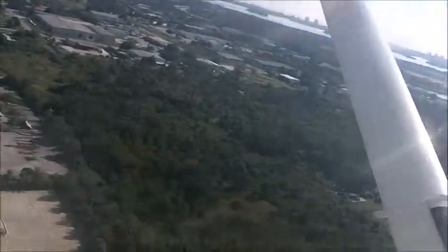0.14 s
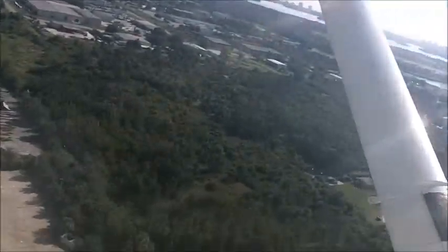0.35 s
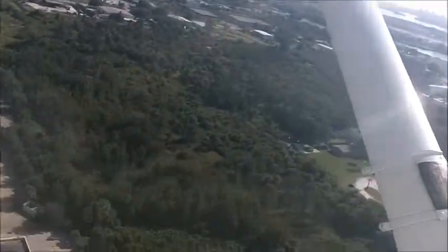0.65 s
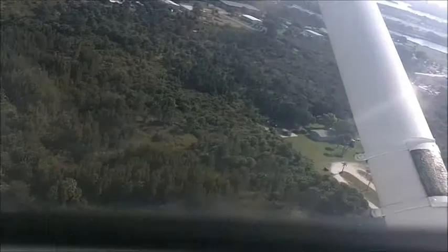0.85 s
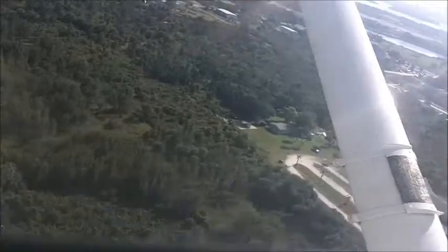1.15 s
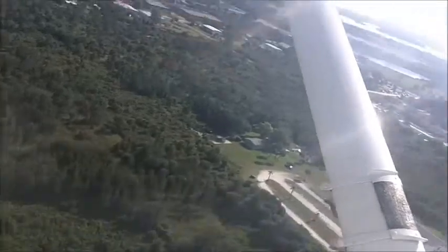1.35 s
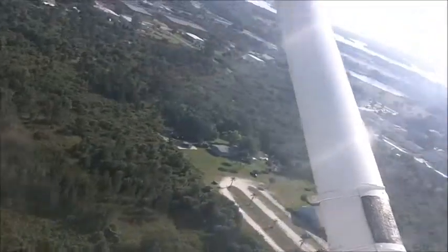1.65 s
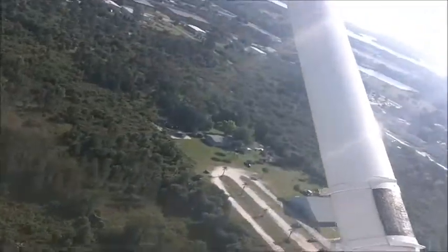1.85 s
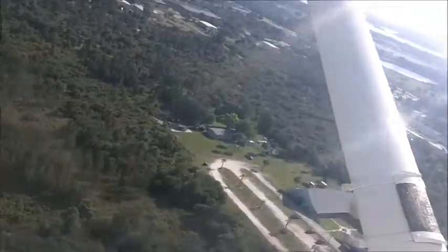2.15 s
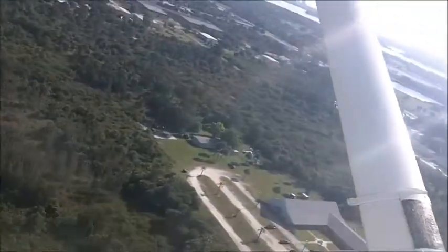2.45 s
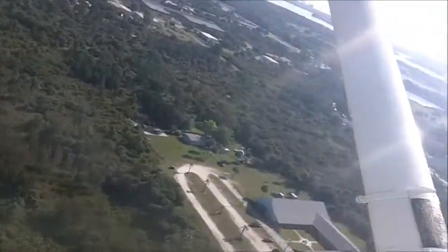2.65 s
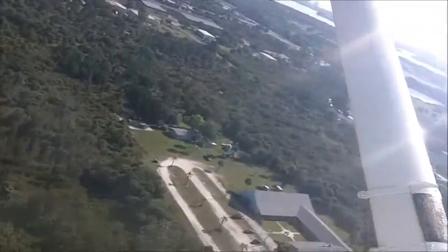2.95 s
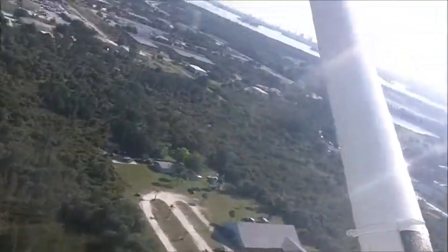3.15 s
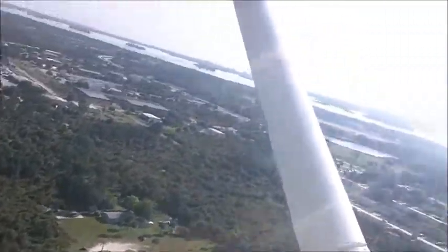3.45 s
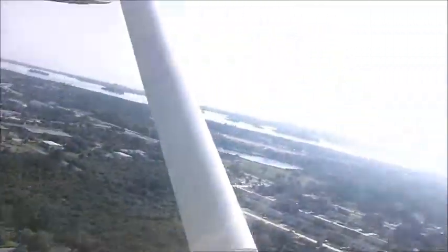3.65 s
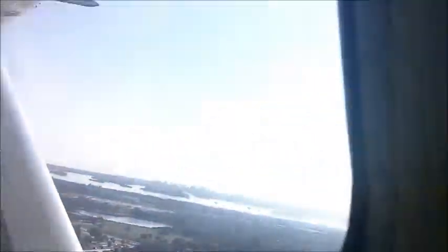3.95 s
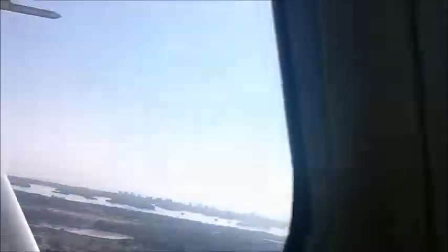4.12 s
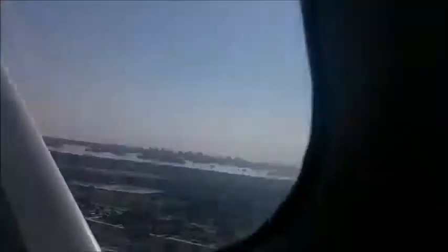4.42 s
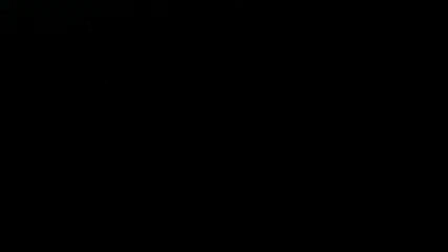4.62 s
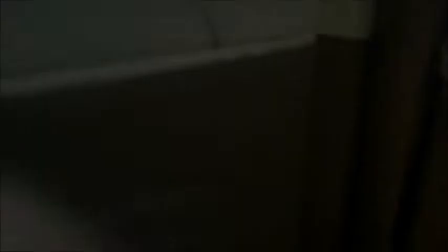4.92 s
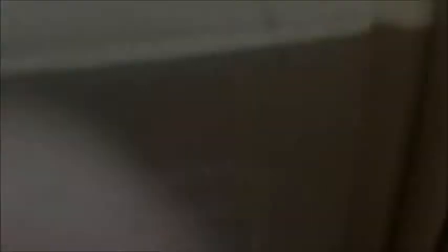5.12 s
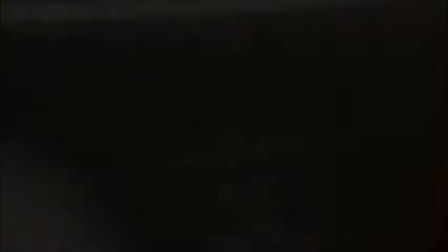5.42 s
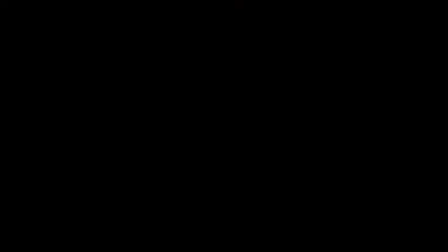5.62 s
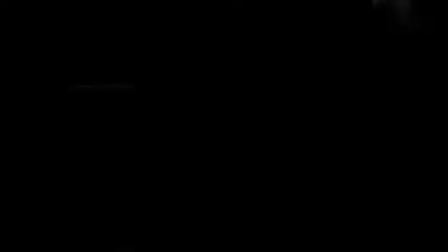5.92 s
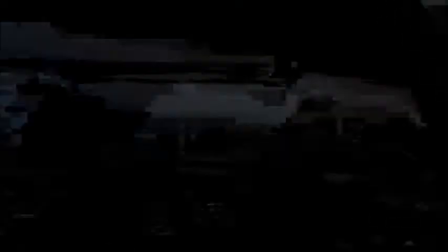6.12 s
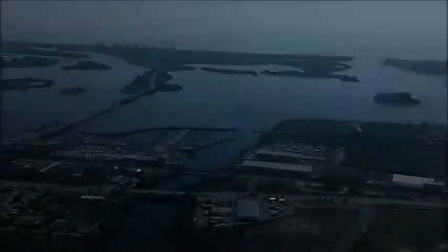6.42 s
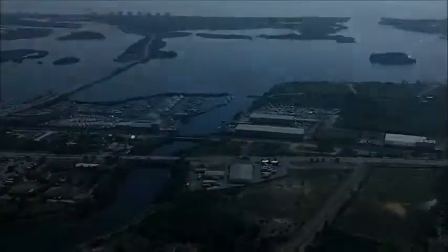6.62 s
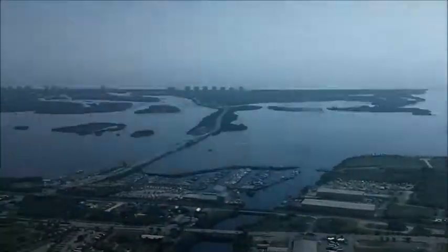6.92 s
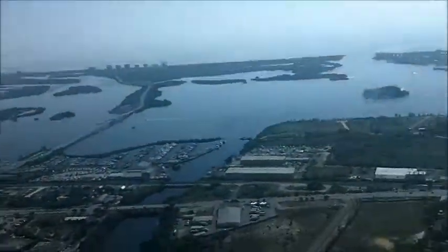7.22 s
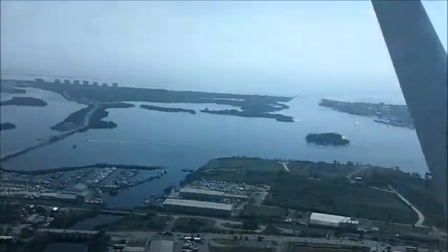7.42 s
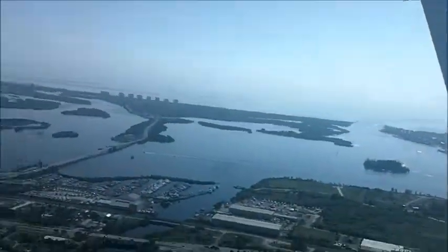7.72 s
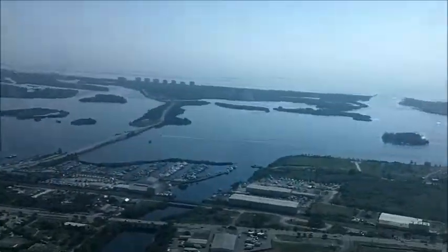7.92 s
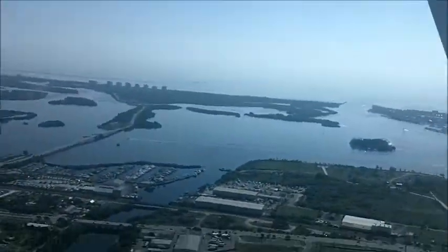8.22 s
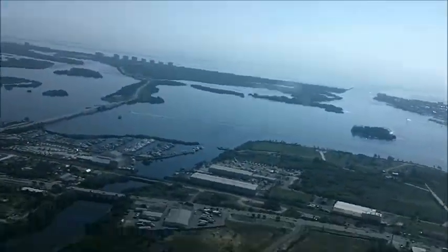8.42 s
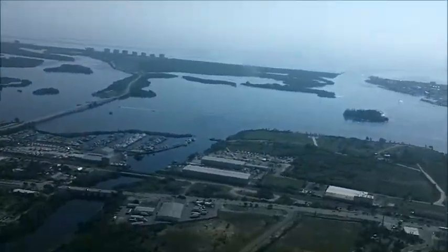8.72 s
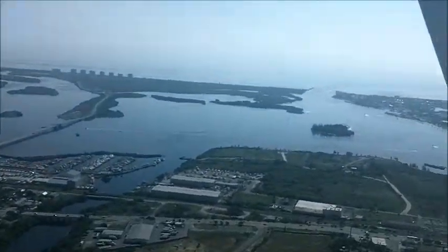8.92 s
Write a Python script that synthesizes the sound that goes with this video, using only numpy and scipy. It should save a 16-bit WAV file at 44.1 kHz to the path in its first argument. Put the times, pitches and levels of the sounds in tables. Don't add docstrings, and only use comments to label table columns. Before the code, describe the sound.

Inside a light aircraft cabin, a steady low engine and propeller drone fades with handling bumps, cuts out, then fades back in slightly higher.

```python
import sys
import numpy as np
from scipy import signal
from scipy.fft import rfft, irfft, next_fast_len
from scipy.io import wavfile

SR = 44100
rng = np.random.default_rng(int(sys.argv[2]) if len(sys.argv) > 2 else 0)


def transcribe(signal):
    frames = np.atleast_2d(signal).T
    limited = np.clip(frames, -1, 1)
    pcm = np.round(limited * 32767).astype(np.int16)
    wavfile.write(sys.argv[1], SR, pcm)


def attenuation_scalar(level_db):
    decades = np.asarray(level_db, float) / 20
    return 10 ** decades


N = 399546

# start [t/s], end [t/s]
TAKES = [
    (0, 5.56093),
    (5.894, 9.06),
]
# centre [t/s], change [level/dB], bell width [t/s]
PALM = [
    (4.8, -7, 0.017),
    (5.02, -3.5, .04),
    (5.2, -3, .02),
    (5.27, -3, 0.01),
    (5.3, -1.5, 0.17),
    (5.4, 0, .02),
    (7.52, -0.5, 0.086),
]
TURN_S = (3.79, 3.95)


def rms_one(x):
    return x / np.sqrt(np.mean(x ** 2) + 1e-20)


def in_time(rows):
    s, *columns = np.transpose(rows)
    return [np.interp(np.arange(N) / SR, s, c) for c in columns]


def at_hz(points, hz):
    points = np.array(points)
    return np.interp(np.log(hz), np.log(points[:, 0]), points[:, 1])


def drift(rate_hz, count=1):
    r = np.exp(-128 * np.pi * rate_hz / SR)
    draws = rng.standard_normal((count, N // 64 + 1002))
    slow = signal.lfilter([1], [1, -2 * r, r * r], draws)[:, 1000:]
    return np.array([np.interp(np.arange(N) / 64, np.arange(len(v)), rms_one(v)) for v in slow])


def span(take):
    return slice(round(take[0] * SR), min(N, round(take[1] * SR)))


def ramp(start_s, end_s):
    return np.clip((np.arange(N) / SR - start_s) / (end_s - start_s), 0, 1)


def swells(rows):
    t = np.arange(N) / SR
    return sum(db * np.exp(-.5 * ((t - s) / width_s) ** 2) for s, db, width_s in rows)


def engine(which, part):
    # [t/s], [f/Hz]
    revs_a = [(0.35, 79.16), (0.95, 79.05), (1.55, 78.99), (2.15, 79.03), (2.75, 79.05), (3.35, 79.03),
              (3.95, 79.02), (4.55, 78.87), (5.15, 78.94)]
    revs_b = [(6.25, 79.64), (6.85, 79.9), (7.45, 80.06), (8.05, 80.17), (8.65, 80.15)]
    # cycle order, re firing tone [level/dB]
    firing_a = [(4, -0.5), (8, -17), (12, -22), (16, -21), (20, -20), (24, -30.5), (28, -29.5), (32, -34),
                (36, -35), (40, -35), (44, -40)]
    firing_b = [(4, 0), (8, -11.5), (12, -23.5), (16, -30.5), (20, -28.5), (24, -29.5), (28, -31),
                (32, -40.5)]
    # cycle order, re firing tone [level/dB]
    uneven_a = [(1, -26.5), (2, -33.5), (3, -23.5), (5, -21.5), (6, -32.5), (7, -38.5), (9, -34),
                (10, -27.5), (11, -29.5), (21, -31.5), (22, -29), (26, -32), (27, -33), (42, -34.5)]
    uneven_b = [(1, -19), (2, -28), (3, -29.5), (5, -20.5), (6, -36.5), (7, -32), (9, -35), (10, -26.5),
                (11, -38)]
    # [t/s], lean [-1..1]
    lean_a = [(0.1, 0.11), (.45, 0.77), (1.15, -1.04), (1.75, 0.64), (2.5, -0.38), (3.3, -0.14),
              (3.8, 0.57), (4.6, 0.29), (5.3, -0.97)]
    lean_b = [(6.1, .3), (6.6, 0.12), (7.4, -0.47), (7.7, -0.39), (8.0, 1), (8.35, 0.68), (8.65, -.3),
              (9.0, -0.44)]
    tones_follow = [
        (1.8, .2, -3),
        (-3, 3.9, 2.5),
        (3.5, 2.5, 0.3),
        (1.5, 1.5, -1.5),
    ]
    tone_db = (-15.5, -16)[which]
    rest_db, rest_slope_db_per_order, crank_bonus_db = -31.5, -0.3747, 2
    flutter_db, jitter_rad = 1.0, .025

    revs, firing, uneven, lean_rows = ((revs_a, firing_a, uneven_a, lean_a),
                                       (revs_b, firing_b, uneven_b, lean_b))[which]
    cycle = np.cumsum(in_time(revs)[0][part]) * (np.pi / 2 / SR)
    cycle = cycle - cycle[-1]
    lean = in_time(lean_rows)[0][part]
    turned = ramp(*TURN_S)[part] * (which == 0)
    second, third, fifth, higher = [row[which] * lean + row[2] * turned for row in tones_follow]
    palm = 0.3 * swells(PALM)[part]
    place_db = {4: palm, 8: second, 12: third, 16: second, 20: fifth}
    order_db = {round(k): db for k, db in [*firing, *uneven]}
    wobble = drift(3.3, count=8)[:, part]
    out = 0
    for k in range(1, round(firing[-1][0]) + 1):
        chance = wobble[k % 7]
        unlisted_db = rest_db + rest_slope_db_per_order * k + crank_bonus_db * (k % 2 == 0)
        db = tone_db + order_db.get(k, unlisted_db)
        if k % 4 == 0:
            db = db + place_db.get(k, higher) + flutter_db * min(k / 16, 1) * chance
        else:
            db = db + (k > 20) * higher + 2.2 * flutter_db * chance
        shake = jitter_rad * np.sqrt(k) * wobble[(k * 3 + 1) % 8]
        phase = (k != 4) * rng.uniform(0, 2 * np.pi)
        out = out + np.sqrt(2) * attenuation_scalar(db) * np.cos(k * cycle + shake + phase)
    return out, cycle


def airflow(which, part, cycle):
    # [f/Hz], density [level/dB]
    roar_a = [(15, -5), (35, 1.5), (55, -3.5), (110, -3.5), (200, -3.5), (300, -10.5), (420, -9),
              (600, -18.5), (950, -21), (1500, -16), (2300, -23.5)]
    roar_b = [(15, -1), (35, -4), (55, -4.5), (110, -6.5), (200, -8.5), (300, -12.5), (420, -15),
              (600, -17), (950, -14.5), (1400, -23.5), (2300, -32.5)]
    # [f/Hz], density [level/dB]
    hiss = [(2350, 0), (2900, -2), (3400, .5), (4350, 2), (4940, 0), (5030, -6), (5350, -10), (6450, -8.5),
            (7300, -16), (8400, -18.5), (9550, -17), (10600, -20), (13200, -27), (15200, -28)]
    # [f/Hz], width [f/Hz], lift [level/dB]
    panels_a = [(393, 130, 3), (803, 140, 6.5), (1019, 60, 5), (1240, 26, 4)]
    panels_b = [(440, 110, 1.7), (787, 110, 5.2), (1060, 76, 1.8), (1224, 80, 8.6)]
    splits_hz = [60, 620, 1350, 2350]
    # first stretch, second stretch, turn [level/dB each], gust share, palm share
    air = [
        (-33.5, -34.5, 3, .3, .4),
        (-29.5, -32, -.7, 0.77, .4),
        (-36, -37, -4.5, 0.66, .6),
        (-42.5, -45.5, 0, .6, 0.82),
        (-45, -45, 1.55, .15, .8),
    ]
    # centre [t/s], change [level/dB], bell width [t/s]
    gusts = [
        (1.96, 0.5, .12),
        (2.31, -1.5, 0.13),
        (3.3, 0.5, .1),
        (7.21, 2.5, 0.034),
        (7.41, 2.5, 0.058),
        (7.68, 2, 0.065),
        (8.36, -0.5, 0.16),
        (8.85, 2, .06),
    ]
    pillar_s, pillar_width_s = 3.64, .13
    pillar_db = [0.1, 0, -1.5, -4, .5]
    patchy_db = [1.2, 0.9, 0.36, 0.74, .6]
    throb = 0.091

    roar, panels, tilt_db_per_oct = ((roar_a, panels_a, -.2), (roar_b, panels_b, 1.6))[which]
    size = next_fast_len(N)
    hz = np.maximum(np.arange(size // 2 + 1) * SR / size, 1)
    hiss_db = at_hz(hiss, hz) - tilt_db_per_oct * np.log2(hz / 4000)
    colour_db = np.where(hz < splits_hz[3], at_hz(roar, hz), hiss_db)
    colour_db = colour_db + sum(db / (1 + (2 * (hz - f) / w) ** 2) for f, w, db in panels)
    shaped = rfft(rng.standard_normal(size)) * attenuation_scalar(colour_db) * (hz > 12)
    patches = drift(13.0, count=6)[:, part]
    band_index = np.digitize(hz, splits_hz)
    pulse = 1 + throb * np.cos(4 * cycle) + 0.92 * throb * np.cos(cycle)
    turned = ramp(*TURN_S)[part] * (which == 0)
    gust, palm = swells(gusts)[part], swells(PALM)[part]
    out = 0
    for k, row in enumerate(air):
        band = rms_one(irfft(shaped * (band_index == k), size)[part])
        level_db = row[which] + row[2] * turned + row[3] * gust + row[4] * palm
        level_db = level_db + swells([(pillar_s, pillar_db[k], pillar_width_s)])[part]
        patch_db = patchy_db[k] * (patches[k] + 0.64 * patches[5])
        out = out + band * attenuation_scalar(level_db + patch_db)
    return out * pulse


def bumps():
    # [t/s], peak [level/dB], rasp re peak [level/dB]
    knocks = [
        (4.468, -35, -5),
        (4.764, -28.5, 0),
        (5.128, -31.5, 0),
        (5.138, -34, 2),
        (5.214, -33, 4.5),
        (5.239, -31.5, 0),
        (5.341, -28.5, -1.5),
        (5.367, -35.5, -1),
        (5.457, -41, 2),
        (5.469, -42.5, 3),
    ]
    # [t/s], rumble [level/dB]
    shifts = [
        (4.62, -37),
        (4.766, -28),
        (4.86, -29),
        (4.998, -27),
        (5.26, -28),
        (5.322, -33),
    ]
    case_hz, case_decay_s, push_s = 298, 0.00095, .003
    rise_db_per_s, fall_db_per_s, grip_floor_db = 250, 160, -44

    t = np.arange(round(.05 * SR)) / SR
    out = np.zeros(N + SR)
    dull = signal.butter(1, [300, 1400], "band", fs=SR, output="sos")
    rasps = signal.sosfilt(dull, rng.standard_normal((len(knocks), len(t))))
    ring = np.cos(2 * np.pi * case_hz * (t - push_s)) * np.exp(-(t - push_s) / case_decay_s)
    knock = np.where(t < push_s, t / push_s, ring)
    for (s, peak_db, rasp_db), rasp in zip(knocks, rasps):
        at = round((s - .001) * SR)
        out[at:at + len(t)] += attenuation_scalar(peak_db + 10.5) * knock
        out[at:at + len(t)] += attenuation_scalar(peak_db + rasp_db - 8.0) * rms_one(rasp) * np.exp(-t / 0.012)
    out = signal.sosfilt(signal.butter(2, 1700, fs=SR, output="sos"), out)

    low = signal.butter(2, [15, 55], "band", fs=SR, output="sos")
    rumble = signal.sosfilt(low, rng.standard_normal(N))
    now = np.arange(N) / SR
    held = ramp(shifts[0][0] - .1, shifts[0][0]) * (now < TAKES[0][1])
    grip_db = np.max([db - np.maximum(rise_db_per_s * (s - now), fall_db_per_s * (now - s))
                      for s, db in shifts], axis=0)
    return out[:N] + rms_one(rumble) * held * attenuation_scalar(np.maximum(grip_db, grip_floor_db) - 3.5)


def scene():
    # [t/s], step [level/dB]
    gain_steps = [
        (6.74, 3.0),
    ]
    out = np.zeros(N)
    for which, take in enumerate(TAKES):
        part = span(take)
        tones, cycle = engine(which, part)
        out[part] = tones + airflow(which, part, cycle)
    second = np.arange(N) / SR > TAKES[0][1]
    held_db = sum(db * (ramp(s, s + 0.027) - 1) for s, db in gain_steps) * second
    fade = np.where(second, ramp(5.857, 8.435), 1 - ramp(3.23, 5.78))
    return (out * fade * attenuation_scalar(held_db) + bumps())[None]


def low_pass(x):
    return signal.sosfilt(signal.butter(12, 15290, fs=SR, output="sos"), x)


def record(dry):
    # [f/Hz], width [f/Hz]
    nulls = [(2703, 520), (5512, 420), (7860, 1150), (10940, 600)]
    x = dry
    for hz, width_hz in nulls:
        x = signal.lfilter(*signal.iirnotch(hz, hz / width_hz, fs=SR), x)
    t = np.arange(N) / SR
    restart_s = 0.0084
    live = (t < TAKES[0][1]) + np.clip((t - TAKES[1][0]) / restart_s, 0, 1)
    return low_pass(x * live)


dry = scene()
out = record(dry)
transcribe(out)
```